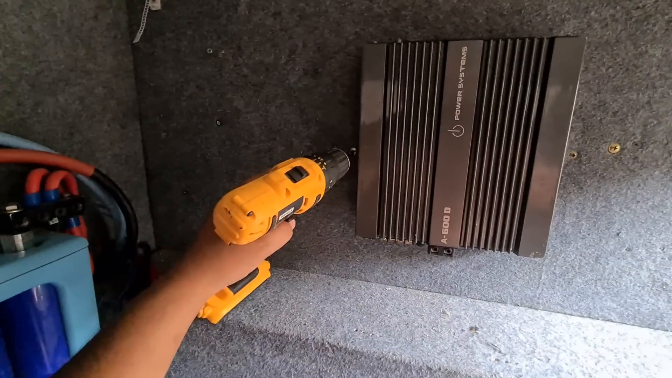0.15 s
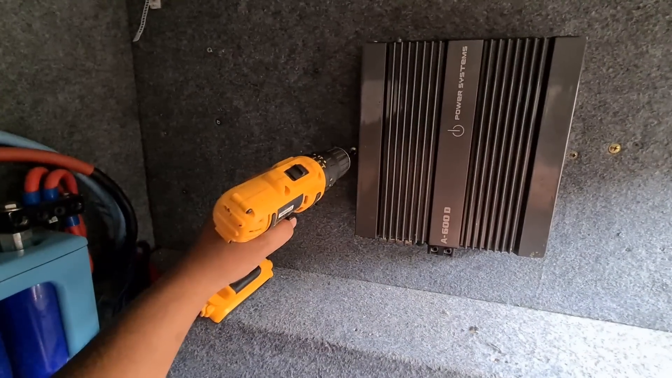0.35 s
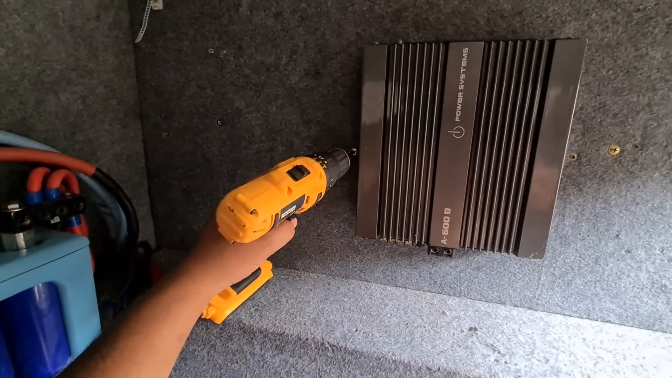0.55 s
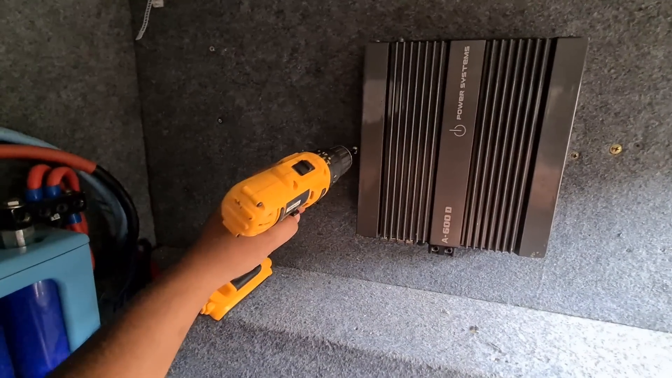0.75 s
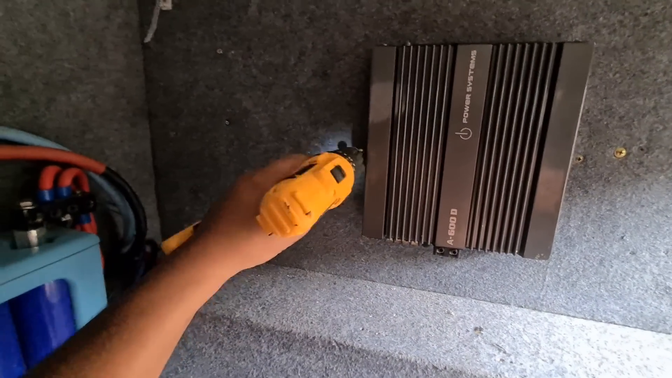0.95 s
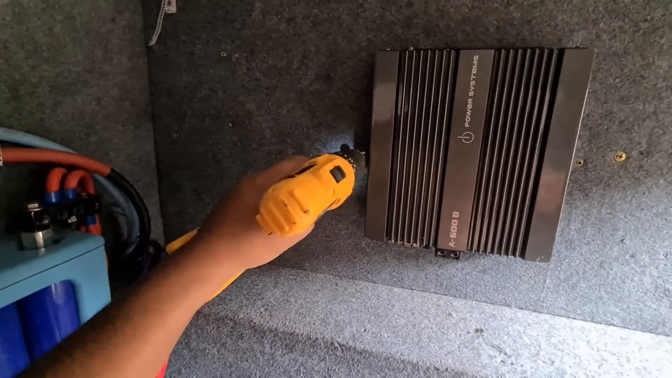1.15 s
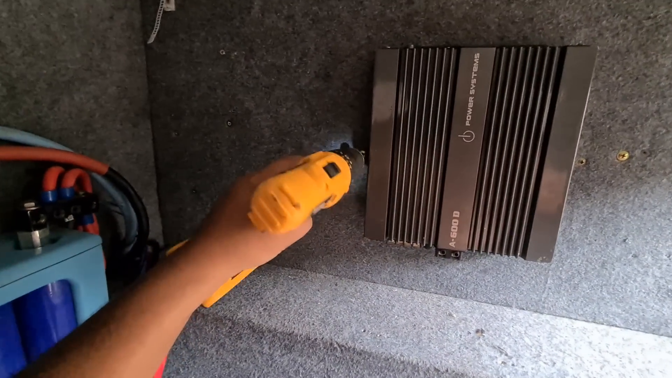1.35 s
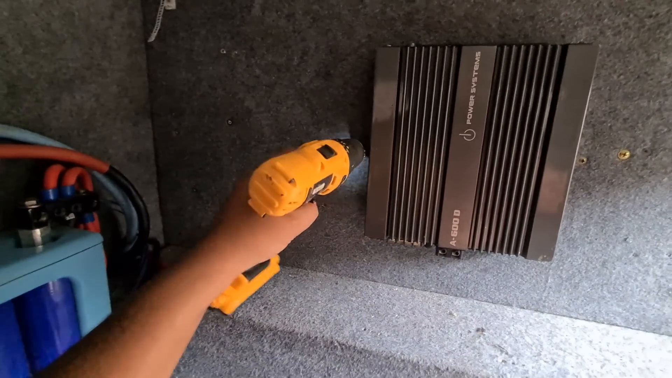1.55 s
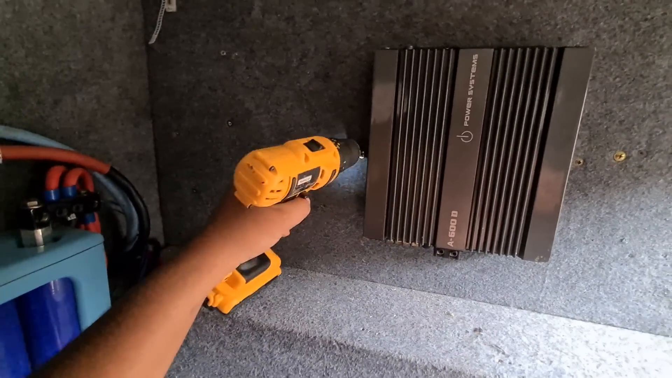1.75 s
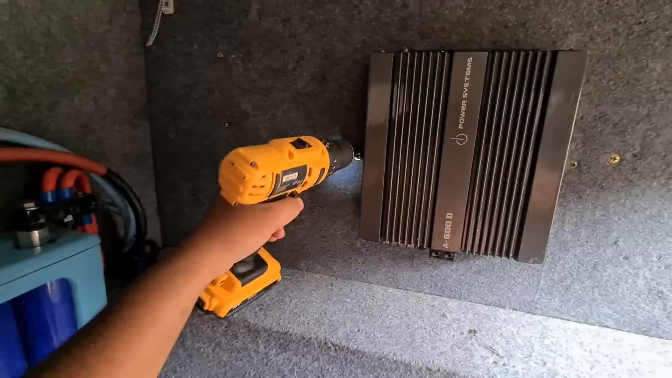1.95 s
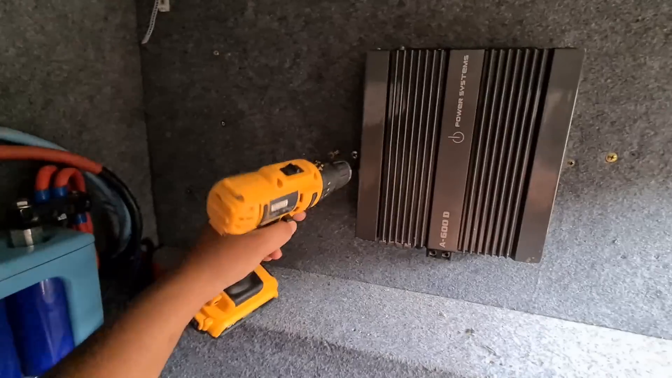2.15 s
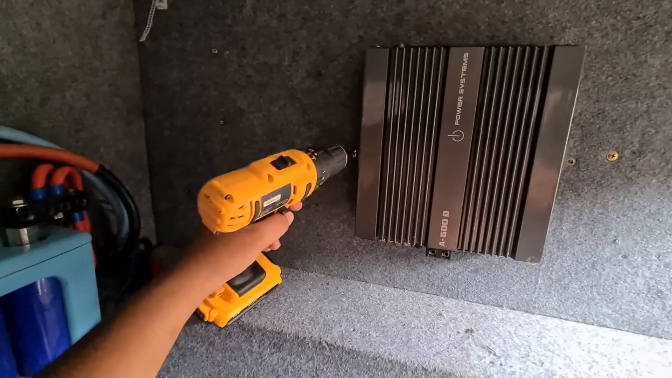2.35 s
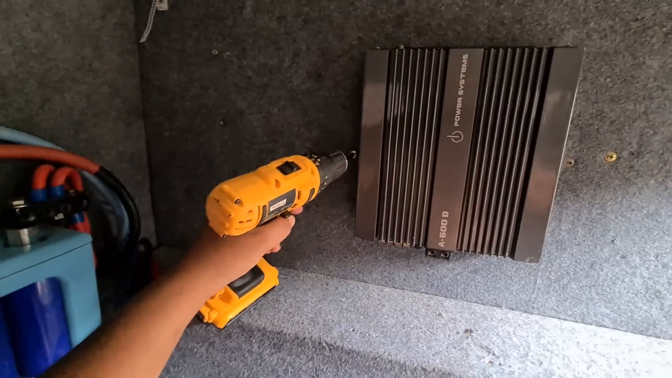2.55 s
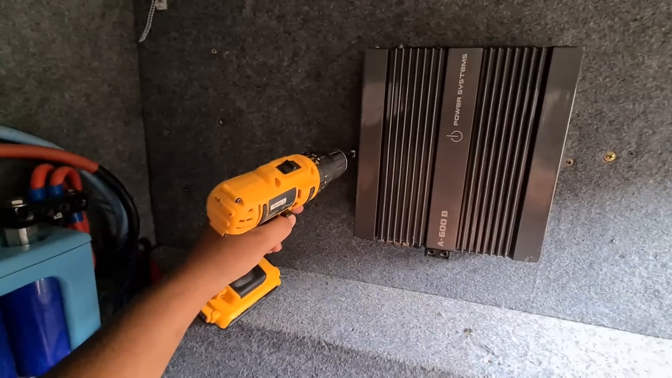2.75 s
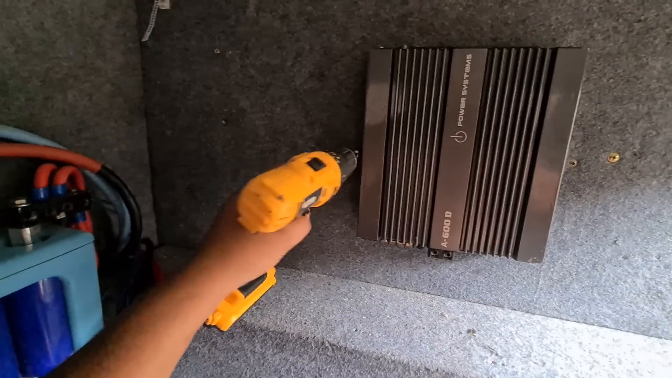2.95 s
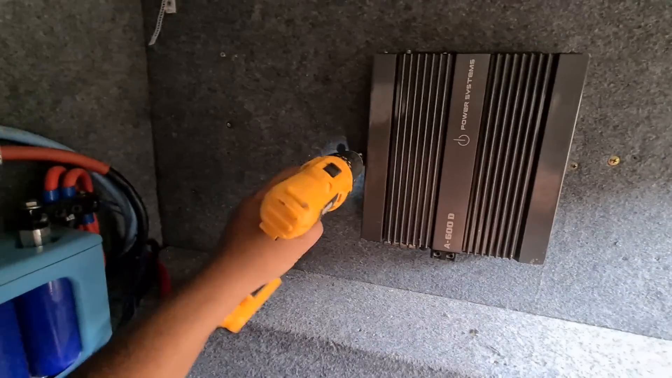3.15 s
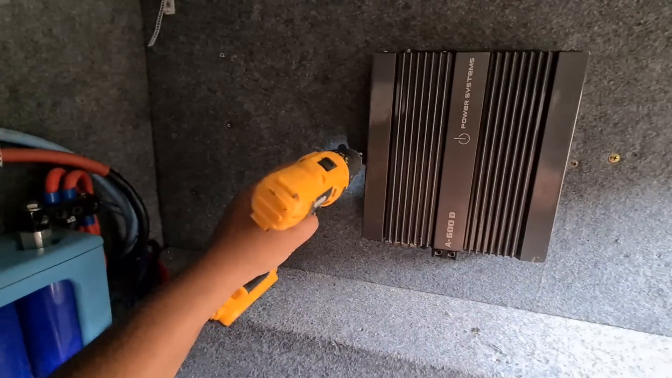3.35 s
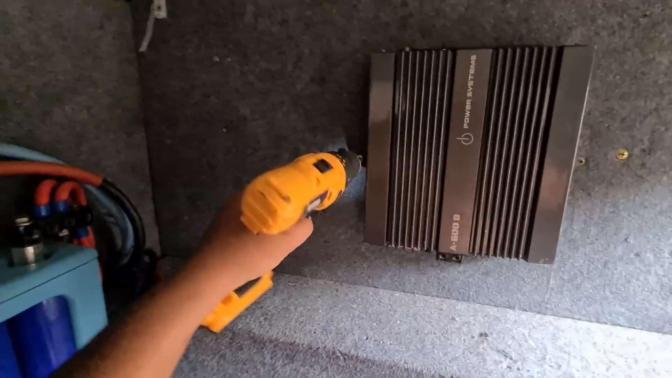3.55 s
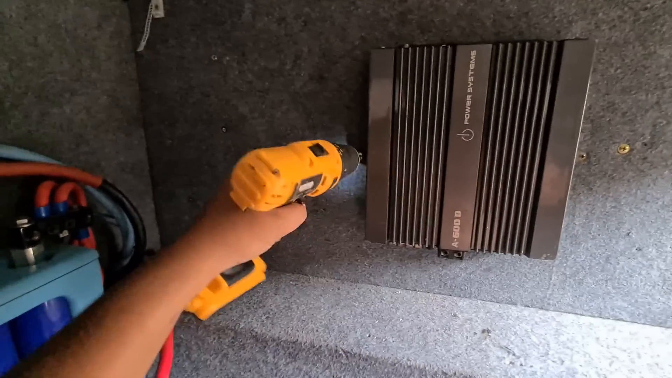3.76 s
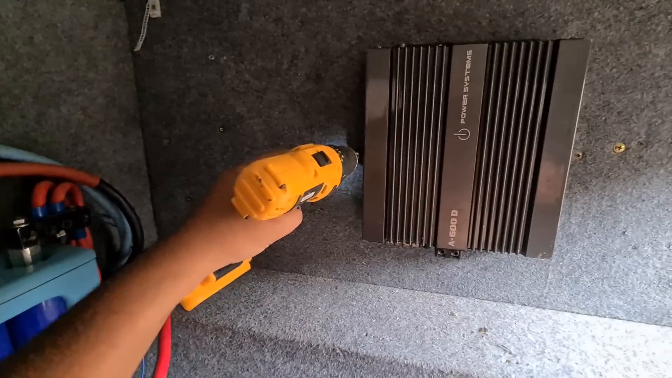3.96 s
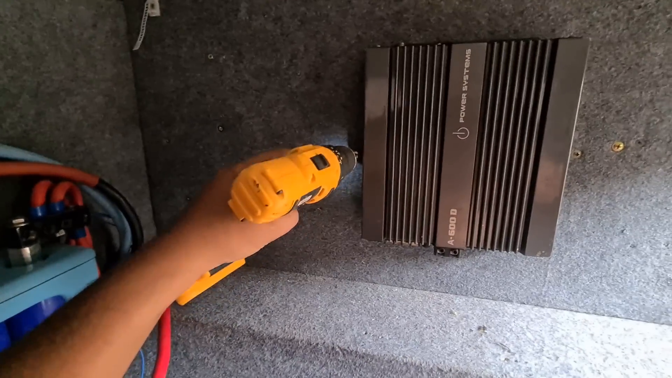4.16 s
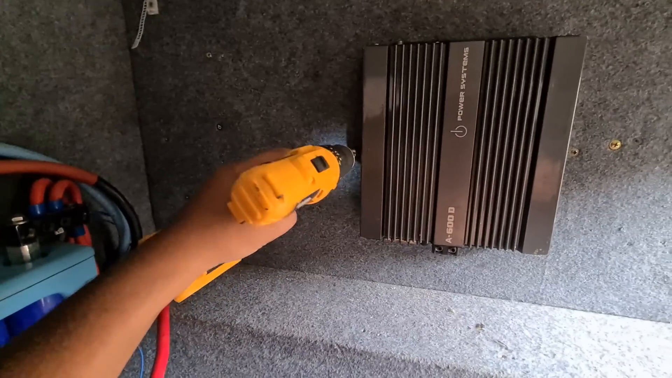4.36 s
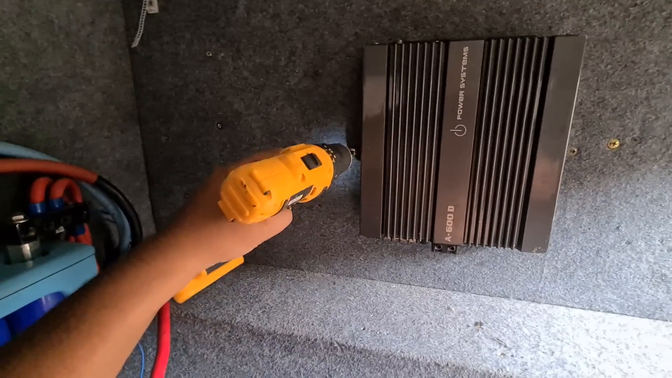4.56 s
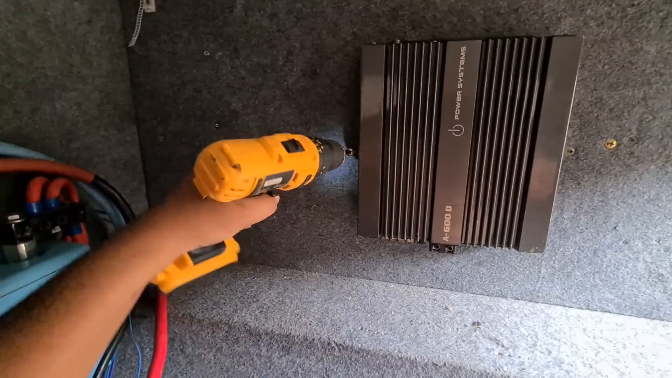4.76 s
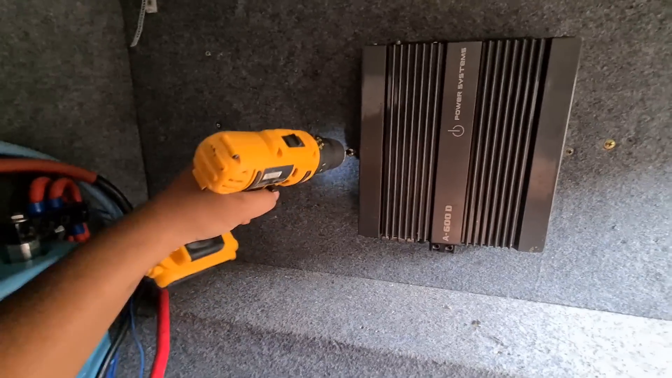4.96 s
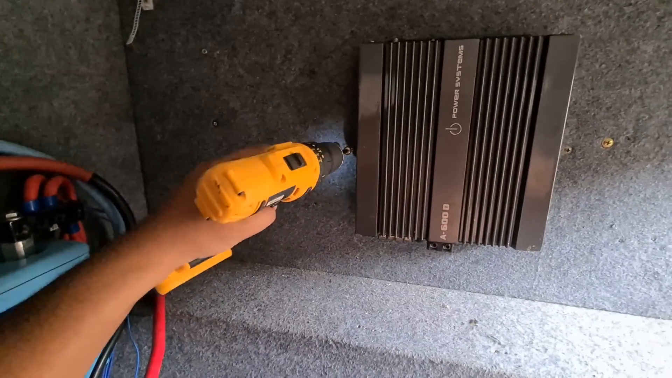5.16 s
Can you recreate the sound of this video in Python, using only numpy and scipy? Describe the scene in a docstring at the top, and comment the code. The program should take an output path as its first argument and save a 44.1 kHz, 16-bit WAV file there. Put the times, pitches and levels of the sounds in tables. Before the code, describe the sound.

A cordless drill works a screw into a board in two bursts, whining and hissing as its slipping bit clacks and thuds.

```python
"""A cordless drill-driver works a screw in a carpeted board in a car trunk, in two bursts.
Its gears whine and rattle, its cooling air hisses, and its speed control whistles as the trigger is
squeezed. When the bit slips out of the screw head the board thuds; when it snaps back in, it drags the
racing motor down. The first burst ends with the drill spinning free. Small ticks, a squeak and a scrape
come in between, the trunk adds a short dull echo, and the street rumbles behind it all."""
import sys
import numpy as np
from scipy import signal
from scipy.fft import rfft, irfft, next_fast_len
from scipy.io import wavfile
from scipy.ndimage import uniform_filter1d

SR = 44100
rng = np.random.default_rng(int(sys.argv[2]) if len(sys.argv) > 2 else 0)


def to_wav(sig):
    """Store sig (one row per channel, or 1-D mono) as 16-bit WAV at the path in sys.argv[1].

    Samples outside -1..1 are clipped; the rate is SR.
    """
    pcm = np.clip(np.atleast_2d(sig), -1, 1) * 32767
    pcm = np.round(pcm).astype(np.int16)
    wavfile.write(sys.argv[1], SR, pcm.T)  # frames by channels


N = 230307
TIME = np.arange(N) / SR


def from_db(db):
    """Turn decibels into a number to multiply by."""
    return 10 ** (np.asarray(db) / 20)

def rms_one(x):
    """Scale a signal so that its average strength (rms) is 1."""
    return x / np.sqrt(np.mean(x ** 2) + 1e-20)

def in_time(tables, fade_s):
    """Join timed rows into smooth curves, plus a gate that is 1 during each table and fades outside."""
    times, *columns = np.transpose(np.vstack(tables))
    spans = [(rows[0][0], rows[-1][0]) for rows in tables]
    gate = sum(np.interp(TIME, [a - fade_s, a, b, b + fade_s], [0, 1, 1, 0]) for a, b in spans)
    return [np.interp(TIME, times, column) for column in columns] + [np.minimum(gate, 1)]

def since(events):
    """Seconds since the latest event."""
    starts = np.r_[-1., [row[0] for row in events]]
    return TIME - starts[np.searchsorted(starts, TIME, "right") - 1]

def at_hz(points, hz):
    """Look up the level at a frequency, between rows of Hz and dB."""
    points_hz, points_db = np.transpose(points)
    return np.interp(np.log(hz + 1), np.log(points_hz + 1), points_db)

def colour(x, points, scale=1, lag=0.):
    """Filter by rows of Hz and dB (the dB times scale), and delay by lag samples."""
    size = next_fast_len(N + 8192, True) // 2 * 2
    hz = np.arange(size // 2 + 1) * SR / size
    cepstrum = irfft(scale * at_hz(points, hz) * np.log(10) / 20, size)
    cepstrum[1:size // 2] *= 2   # folded so that the filter never rings ahead of the sound
    cepstrum[size // 2 + 1:] = 0
    response = np.exp(rfft(cepstrum) - 2j * np.pi * hz * lag / SR)
    return irfft(rfft(x, size) * response, size)[..., :N]

def drift(rate_hz):
    """A random wander about 1 in size; a higher rate wanders faster."""
    pole = np.exp(-80 * np.pi * rate_hz / SR)
    noise = rng.standard_normal(N // 40 + 2002)
    slow = signal.lfilter([1], [1, -2 * pole, pole * pole], noise)[2000:]
    return np.interp(np.arange(N) / 40, np.arange(len(slow)), rms_one(slow))

def ring(force, hz, t60):
    """One ringing tone set off by a force. The fade time t60 is the seconds it takes to drop 60 dB."""
    decay, angle = from_db(-60 / (t60 * SR)), 2 * np.pi * hz / SR
    return signal.lfilter([0, np.sin(angle)], [1, -2 * decay * np.cos(angle), decay ** 2], force + 1e-18)

def add(out, start_s, piece):
    """Mix a short sound in at its start time."""
    i = round(start_s * SR)
    out[i:i + len(piece)] += piece[:N - i]

def burst(t60, rise_s):
    """A puff of noise that swells quickly and dies away."""
    t = TIME[:4096]
    return rng.standard_normal(4096) * from_db(-60 * t / t60) * np.minimum(t / rise_s, 1) ** 2

def tuned_burst(hz, t60, q, rise_s):
    """A puff of noise centred on a pitch; a higher q makes the pitch clearer."""
    return signal.lfilter(*signal.iirpeak(hz, q, SR), burst(t60, rise_s))

DRILL_LAG, BOARD_LAG = 16.87, 10.02   # samples by which the right side hears each one later
def stereo(x, lag):
    """One sound that reaches the left side first and the right side lag samples later."""
    return np.array([x, colour(x, [(0, 0)], lag=lag)])

def spread_noise(spectrum, grain_db, scattered_share=.75):
    """Grainy noise from the drill: some arrives directly, the rest is scattered and differs per side."""
    grain = from_db(grain_db * drift(190))
    direct = stereo(rng.standard_normal(N) * grain, DRILL_LAG)
    scattered = rng.standard_normal((2, N)) * grain
    mix = np.sqrt(1 - scattered_share) * direct + np.sqrt(scattered_share) * scattered
    return rms_one(colour(mix, spectrum))


# The tone of the street. Each row: frequency in Hz, level in dB.
STREET_COLOUR = [(12, -21), (20, -11), (53, -10), (83, 1), (104, -16.5), (198, -27.5), (607, -28.5),
                 (780, -40), (1090, -26), (1220, -35.5), (2390, -39), (2990, -33.5), (3250, -44.5),
                 (6360, -46), (16000, -94)]
# How loud the street is. Each row: time in seconds, level in dB.
STREET_LEVELS = [(0, -46.5), (.8, -46), (2.3, -46), (2.6, -41), (2.8, -39.5), (3, -39.5), (5.22, -37.5)]
# How alike left and right are. Each row: frequency in Hz, likeness (1 is the same, 0 is unrelated).
STREET_LIKENESS = [(60, 0.95), (240, 0.86), (950, -0.055), (3770, -0.00079), (15000, 0.32)]
def street():
    """Street noise around the open trunk: alike on both sides in the bass, mostly unrelated higher up."""
    shared, opposed = rng.standard_normal((2, N))
    shared = colour(shared, [(hz, 10 * np.log10(1 + alike)) for hz, alike in STREET_LIKENESS])
    opposed = colour(opposed, [(hz, 10 * np.log10(1 - alike)) for hz, alike in STREET_LIKENESS])
    pair = np.array([shared + opposed, shared - opposed])
    level_db, _ = in_time([STREET_LEVELS], fade_s=.1)
    return from_db(level_db + .5 * drift(8.5)) * rms_one(colour(pair, STREET_COLOUR))

def trunk_echo(x, t60=.085, carpet_hz=5100):
    """Sound bounces along six paths a side, and the carpet dulls it on every round."""
    size = next_fast_len(N + SR // 2, True)
    phase_step = 2j * np.pi * np.arange(size // 2 + 1) / size
    dull = 1 / (1 + phase_step * SR / (2 * np.pi * carpet_hz))
    lags = rng.uniform(.004, .016, 12) * SR
    loops = [from_db(-60 * lag / SR / t60) * dull * np.exp(-phase_step * lag) for lag in lags]
    tails = [sum(g / (1 - g) * (-1) ** k for k, g in enumerate(loops[side::2])) for side in (0, 1)]
    return irfft(rfft(x, size) * np.array(tails), size)[:, :N]

# The squeak. In order: start in seconds, pitch in Hz, level in dB, length in seconds.
SQUEAK = (.014, 2760, -35, .014)
def squeak():
    """One brief, high tone that swells and fades."""
    start, hz, db, length = SQUEAK
    out, t = np.zeros(N), TIME[:round(length * SR)]
    add(out, start, from_db(db) * np.sin(np.pi * t / length) * np.sin(2 * np.pi * hz * t))
    return out

# The scrape. In order: start, loudest moment and end in seconds, then level in dB.
SCRAPE = (2.62, 2.8, 2.86, -57)
# The tone of the scrape. Each row: frequency in Hz, level in dB.
SCRAPE_COLOUR = [(1200, -25), (2450, 0), (3300, -8), (4600, -3), (7000, -14), (12000, -35)]
def bit_scrape():
    """The bit rubs over the screw head, feeling for its grip."""
    *times, db = SCRAPE
    return from_db(db) * np.interp(TIME, times, [0, 1, 0]) * spread_noise(SCRAPE_COLOUR, grain_db=3)

# Small clicks. Each row: start in seconds, level in dB, pitch in Hz, fade time in seconds.
TICKS = [(0.683, -32, 2580, 0.016), (0.774, -32, 3000, 0.017), (0.83, -47, 3590, 0.025),
         (0.845, -25, 3330, 0.019), (0.865, -16, 3170, 0.015), (0.897, -26, 4040, 0.15),
         (1.497, -8.5, 8100, 0.015), (2.054, -12, 4900, 0.12), (2.057, -1.5, 5340, 0.014),
         (2.662, -44, 8000, 0.022), (2.682, -38, 7450, 0.013), (2.779, -24.5, 2020, 0.023),
         (2.813, -17, 1340, 0.018), (2.824, -42, 3400, 0.021), (2.975, -42, 4000, 0.018),
         (3.012, -35, 3000, 0.074), (3.061, -33, 2930, 0.028), (3.172, -10.5, 4230, 0.017)]
def ticks():
    """The trigger, the brake and the plastic shell click, each with a rough pitch."""
    out = np.zeros(N)
    for start, db, hz, t60 in TICKS:
        add(out, start, from_db(db) * tuned_burst(hz, t60, q=2.4, rise_s=.0011))
    return out

# The tone of the tool's shaking. Each row: frequency in Hz, level in dB.
SHAKE_COLOUR = [(60, -16), (100, -8.5), (190, -10.5), (300, -1.5), (500, -7.5), (1200, -6), (2500, -5)]
def tool_shake(level_db):
    """The uneven force with which the running tool shakes the board."""
    return from_db(level_db + 3.15 * drift(28)) * colour(rng.standard_normal(N), SHAKE_COLOUR)

# Rattly knocks. Each row: start in seconds, level in dB, pitch in Hz, fade time in seconds.
KNOCKS = [(0.257, -41.5, 435, 0.081), (0.53, -47, 380, 0.19), (.546, -48, 610, 0.13),
          (.668, -56, 496, 0.055), (.68, -41, 248, 0.091), (.777, -39.5, 275, 0.049),
          (1.074, -34, 876, 0.038), (2.053, -43.5, 1280, 0.083), (2.56, -40, 523, 0.051),
          (2.972, -51, 257, 0.067), (3.155, -44.5, 440, 0.15)]
def knocks():
    """The force of the tool and bit knocking against the board."""
    force = np.zeros(N)
    for start, db, hz, t60 in KNOCKS:
        add(force, start, from_db(db) * tuned_burst(hz, t60, q=.9, rise_s=.0016))
    return force

# Soft blows. Each row: start in seconds, level in dB, hardness in Hz (higher is sharper).
THUDS = [(.681, -17, 408), (0.777, -16.5, 475), (1.216, -7, 278), (1.356, -5.5, 251.6), (1.418, -3, 259),
         (1.455, -5.5, 250), (1.506, -6.5, 194), (1.958, -26, 312), (2.71, -28.5, 308), (3.223, -13.5, 198),
         (3.294, -7, 255), (3.457, -14.5, 191), (3.524, -2.5, 190), (3.748, -7.5, 250),
         (4.216, -7.5, 243.5), (4.532, -5, 220), (4.708, -6.5, 232), (4.845, -6, 229), (4.935, -7.5, 240.7),
         (5.055, -7.5, 256), (5.205, -6.5, 240)]
def thuds():
    """The push on the board when the bit slips off or the tool is set down."""
    force, t = np.zeros(N), TIME[:1024]
    for start, db, hardness_hz in THUDS:
        push = t * t * np.exp(-2 * np.pi * .99 * hardness_hz * t)   # a softer contact lasts longer
        add(force, start, from_db(db) * push / push.sum())
    return force

# Snaps of the bit. Each row: time in seconds, level in dB, extra dB for the crack, extra dB for the clack.
SNAPS = [(0.553, -25, -19, -11), (0.911, -16.5, -1.5, -5), (1.251, -6, -13.5, 0.5), (1.387, -6.5, -10, -22),
         (1.432, -9, -11, -23), (1.482, -13, -29, -2), (3.187, -17, -3, -43.5), (3.277, -10.5, -0.5, -13),
         (3.326, -9, 1, -3), (3.359, -7, -4.5, -3), (3.391, -7, -4, -24), (3.495, -12.5, 1, 0.5),
         (3.561, -11, 0.5, 1), (3.782, -12.5, 3, 5), (4.25, -11.5, -0.5, 5.5), (4.564, -13.5, 3, 4),
         (4.737, -10, -2, -5), (4.872, -8, -6, -12), (4.964, -12.5, -1.5, -11), (5.085, -9.5, -5, -6.5)]
# The tones of the bit's chatter and of its crack. Each row: frequency in Hz, level in dB.
CHATTER_COLOUR = [(80, -3.5), (200, -1.5), (330, 1), (500, 5), (800, 1.5), (1300, -0.5), (2200, 7)]
CRACK_COLOUR = [(880, -58), (1500, -39), (2970, -6.5), (3780, -12.5), (4610, -9), (7320, -7), (8260, -17),
                (15200, -15), (16500, -47)]
def bit_snaps():
    """The bit snaps into the screw: chatter and a steel clack push the board, and a crack hits the air."""
    chatter, clack, crack = np.zeros((3, N))
    for s, db, crack_db, clack_db in SNAPS:
        add(chatter, s - .003, from_db(db - 17.5) * burst(.038, rise_s=.0028))
        steel = tuned_burst(hz=1256, t60=.035, q=2.5, rise_s=.0052)
        add(clack, s - .002, from_db(db + clack_db - 8.5) * steel)
        sharp = burst(.017, rise_s=.0035) + from_db(-20) * burst(.025, rise_s=.002)
        add(crack, s - .002, from_db(db + crack_db + 6) * sharp)
    filter_gain = np.sqrt(np.mean(from_db(at_hz(CRACK_COLOUR, np.linspace(0, SR / 2, 200))) ** 2))
    return clack + colour(chatter, CHATTER_COLOUR), colour(crack, CRACK_COLOUR) / filter_gain

# The tones of the board and trunk floor. Each row: pitch in Hz, level in dB, fade time in seconds.
BOARD_TONES = [(79.3, -34, 0.04), (96.5, -2.5, 0.35), (108.5, -5, 0.29), (149, -5, 0.17), (190, 4.5, 0.069),
               (297, -2, 0.031), (449, -2, 0.035), (507.6, -5.5, 0.048), (688, -11.5, 0.025),
               (884.5, -14, 0.035), (1164, -3, 0.012), (1332, -5.5, 0.012), (1388, -19, 0.034),
               (2000, -0.5, 0.0065)]
def board(force, low_cut_hz=112.3):
    """Every force rings the same tones in the wood; very slow motion pushes little air."""
    wood = sum(from_db(db) * ring(force, hz, t60) for hz, db, t60 in BOARD_TONES)
    return signal.sosfilt(signal.butter(2, low_cut_hz, "high", fs=SR, output="sos"), wood)

# Trigger squeezes. Each row: first touch, firm press and end of the whistle, all in seconds.
SQUEEZES = [(.85, .87, 1.06), (3.06, 3.12, 3.16)]
# The whistle's first four harmonics (whole multiples of its pitch). Each entry: level in dB.
WHISTLE_HARMONICS_DB = [-2, 3, -10, -18]
def trigger_whistle(touch_hz=3195, pressed_hz=2935, touch_db=-52.5, pressed_db=-48.5, slide_s=.025):
    """The motor coils whistle at the speed control's switching rate, which drops as the trigger goes in."""
    out = np.zeros(N)
    for touch, press, end in SQUEEZES:
        lightness = np.exp(-np.maximum(TIME - press, 0) / slide_s)
        hz = pressed_hz + (touch_hz - pressed_hz) * lightness
        phase = 2 * np.pi * np.cumsum(hz * (1 + .002 * drift(80))) / SR
        tone = sum(from_db(db) * np.sin(k * phase) for k, db in enumerate(WHISTLE_HARMONICS_DB, 1))
        gate = np.interp(TIME, [touch - .012, touch, end, end + .012], [0, 1, 1, 0])
        out += from_db(pressed_db + (touch_db - pressed_db) * lightness) * gate * tone
    return out

# The tone of the cooling air. Each row: frequency in Hz, level in dB.
AIR_COLOUR = [(2940, -41), (5000, -26), (5720, 6), (8410, -10), (14000, -11.5), (15200, -11), (16300, -30),
              (16500, -78)]
def cooling_air(mesh_hz, first_burst, db_per_octave=8):
    """Cooling air hisses, louder as the motor speeds up, and set higher in the first burst."""
    level_db = np.where(first_burst, -29.5, -34.5) + db_per_octave * np.log2(mesh_hz / FREE_HZ)
    return from_db(level_db + .21 * drift(40)) * spread_noise(AIR_COLOUR, grain_db=.5)

# Strain on the tool, one list per burst. Each row: time in seconds, rattle in dB, board shake in dB.
LOAD = [
    [(.84, -56, -99), (.92, -46, -53), (1.03, -39, -61), (1.07, -31, -47.5), (1.14, -26, -51),
     (1.36, -30, -51.5), (1.41, -32.5, -36.5), (1.55, -32, -54.5), (1.9, -31.5, -63.5), (1.99, -32, -57),
     (2.045, -30.5, -91)],
    [(3.155, -42, -63), (3.22, -30, -56), (3.3, -30.5, -44), (3.315, -40, -49.5), (3.385, -39, -43),
     (3.45, -40, -51.5), (3.55, -39.5, -55), (3.6, -39.5, -55), (3.81, -39.5, -58.5), (3.97, -38, -53),
     (4.2, -36, -57), (4.4, -36.5, -53.5), (4.7, -36.5, -59.5), (5.22, -39.5, -55)],
]
def strain():
    """How hard the working tool rattles and shakes; after the first burst the gears coast to a stop."""
    rattle_db, shake_db, running = in_time(LOAD, fade_s=.015)
    first_burst = TIME < LOAD[1][0][0] - .1
    coast_db = LOAD[0][-1][1] - 1505 * (TIME - BRAKE_S) ** 2   # dies away ever faster
    coast = first_burst * (TIME > BRAKE_S - .02) * from_db(coast_db)
    return np.maximum(from_db(rattle_db) * running, coast), shake_db, running, first_burst

# The tone of the clatter. Each row: frequency in Hz, level in dB.
RATTLE_COLOUR = [(350, -53), (600, -10), (933, -6.5), (1010, -7.5), (1140, 5.5), (1700, -3.5), (1990, 0),
                 (2710, -3.5), (2960, 1.5), (3470, 1), (5410, -2), (8310, -26), (9000, -18.5), (11700, -55),
                 (19800, -120)]
# The tones of the drill's shell. Each row: pitch in Hz, level in dB, fade time in seconds.
SHELL_TONES = [(530, -6, .04), (1120, -1, .035), (1290, 0, .03), (2050, -9, .02), (2950, -3, .018),
               (3300, -6, .02), (4600, -6, .012), (5400, -2, .012)]
def gear_rattle(gain):
    """Loose gear teeth clatter and set the shell ringing."""
    flicker = from_db(.8 * drift(15))
    clatter = spread_noise(RATTLE_COLOUR, grain_db=2)
    shell = sum(from_db(db) * rms_one(ring(clatter, hz, t60)) for hz, db, t60 in SHELL_TONES)
    return gain * flicker * rms_one(clatter + from_db(-9.5) * shell)

FREE_S, BRAKE_S = 1.52, 2.05   # the screw is out; the trigger is let go
FREE_HZ = 924   # the mesh rate (how often gear teeth meet) that the motor heads for with no load
# The motor under load, one list per burst. Each row: time in seconds, mesh rate in Hz, whine in dB.
SPEED = [
    [(.82, 40, -77), (1.01, 171.4, -46), (1.1, 381.7, -45), (1.22, 568, -32.5), (1.36, 562, -38.5),
     (1.41, 701, -26), (1.52, 818, -50)],
    [(3.14, 238, -60), (3.22, 505, -47), (3.58, 505, -42), (3.69, 480, -48), (3.74, 522, -41.5),
     (3.93, 542.4, -46), (4.05, 493.6, -44.5), (4.21, 554.6, -38), (4.36, 577, -44.5), (4.45, 651, -37.5),
     (4.53, 677, -38.5), (4.65, 743, -39), (4.82, 808, -39), (4.93, 856, -34), (5.22, 867, -39)],
]
def motor(drag_s=.024, settle_s=.02, run_up_s=.12, ease_s=.03):
    """The motor is racing at each snap and gets dragged down; with the screw out it runs up freely."""
    loaded_hz, whine_db, loaded = in_time(SPEED, fade_s=.009)
    since_snap = since(SNAPS)
    race = np.exp(-np.maximum(since_snap, settle_s) / drag_s)
    race_hz = 324.5 * race * np.sqrt(loaded_hz / FREE_HZ)
    gripping = (since_snap > settle_s) & (since_snap < since(THUDS))   # from a snap to the next slip
    free = np.interp(TIME, [FREE_S - .008, FREE_S, BRAKE_S, BRAKE_S + .008], [0, 1, 1, 0])
    run_up_hz = FREE_HZ - (FREE_HZ - SPEED[0][-1][1]) * np.exp(-np.maximum(TIME - FREE_S, 0) / run_up_s)
    sag_hz = 38 * np.exp(np.minimum(TIME - BRAKE_S, 0) / ease_s)   # the trigger eases off
    mesh_hz = np.where(free > 0, run_up_hz - sag_hz, loaded_hz + race_hz)
    return mesh_hz, whine_db, loaded * uniform_filter1d(gripping * 1., size=400), free

# How the shell colours the whine. Each row: frequency in Hz, level in dB.
WHINE_COLOUR = [(540, -2), (800, -13), (1120, 0), (1700, -24), (2400, -13), (3100, -1), (3700, -4),
                (4400, 0), (5400, -1), (6200, -10), (9000, -22)]
# The tones of the free spin. Each entry: a multiple of the mesh rate (1/3 is the motor's own turning).
SPIN_MULTIPLES = [1 / 3, 3, 4, 6, 19 / 3, 7, 8, 10]
# Their strengths, in the same order. Each entry: level in dB.
SPIN_LEVELS_DB = [-4, -16, 5, -4, 3, 7, 0, -12]
def gear_whine(mesh_hz, whine_db, loaded, free, wobble=.8, spin_db=-40):
    """Gear teeth meeting under load make wavering harmonics; spinning free, a few tones stand out."""
    phase = 2 * np.pi * np.cumsum(mesh_hz * (1 + .003 * drift(25) + .009 * drift(250))) / SR
    mesh = np.zeros(N)
    for k in range(1, 15):
        mesh += from_db(at_hz(WHINE_COLOUR, k * mesh_hz) + 4 * drift(40)) * np.sin(k * phase + k * k)
    slowness = np.clip(1 - mesh_hz / FREE_HZ, 0, 1)
    mesh *= 1 + wobble * slowness * np.cos(phase / 3)   # near a stall it swells once per motor turn
    spin_phase = 2 * np.pi * np.cumsum(mesh_hz * (1 + .001 * drift(40) + .002 * drift(250))) / SR
    spin = sum(from_db(db + 2.5 * drift(20)) * np.sin(k * spin_phase)
               for k, db in zip(SPIN_MULTIPLES, SPIN_LEVELS_DB))
    return from_db(whine_db) * loaded * mesh + from_db(spin_db) * free * spin

# How much louder the left side is than the right. Each row: frequency in Hz, difference in dB.
LEFT_OVER_RIGHT = [(60, -1.0), (110, -0.5), (200, 0.5), (380, 1.0), (700, -0.5), (1290, -2.5), (2380, -4.5),
                   (4400, -10.0), (8120, -5.5), (15000, -4.5)]
def scene():
    """Mix the drill and the board in stereo, with the trunk's echo and the street around them."""
    mesh_hz, whine_db, loaded, free = motor()
    rattle_gain, shake_db, running, first_burst = strain()
    gears = gear_rattle(rattle_gain)
    air = running * cooling_air(mesh_hz, first_burst)
    force = running * tool_shake(shake_db) + thuds() + knocks()
    snap_force, crack = bit_snaps()
    wood = board(force + snap_force)
    clicks = ticks() + crack
    tones = gear_whine(mesh_hz, whine_db, loaded, free) + trigger_whistle() + squeak()
    echoes = trunk_echo(clicks + from_db(-20.5) * wood)
    drill = stereo(clicks + tones, DRILL_LAG) + gears + air + bit_scrape()
    left, right = drill + stereo(wood, BOARD_LAG) + echoes + street()
    return np.array([colour(left, LEFT_OVER_RIGHT, scale=.5), colour(right, LEFT_OVER_RIGHT, scale=-.5)])

def record(dry, hiss_db=-74.5, cutoff_hz=16830):
    """The microphones hiss faintly, loud peaks are rounded off, and the highest treble is cut."""
    hissy = dry + from_db(hiss_db) * rng.standard_normal((2, N))
    rounded = 1.1 * np.tanh(hissy / 1.1)
    return signal.sosfilt(signal.cheby2(20, 70, cutoff_hz, fs=SR, output="sos"), rounded)


dry = scene()
out = record(dry)
to_wav(out)
```